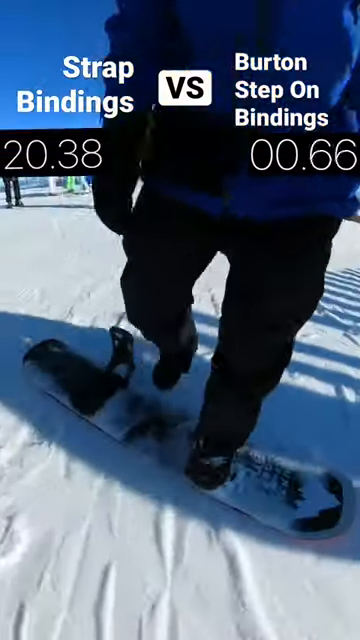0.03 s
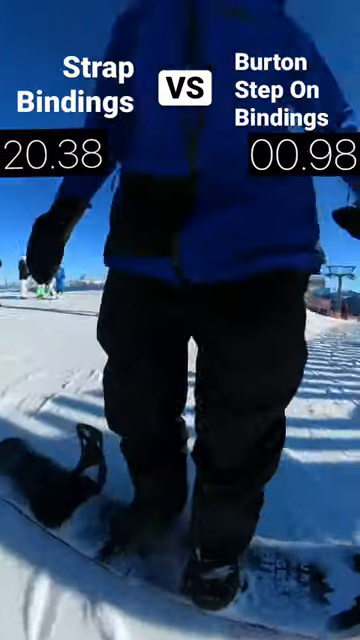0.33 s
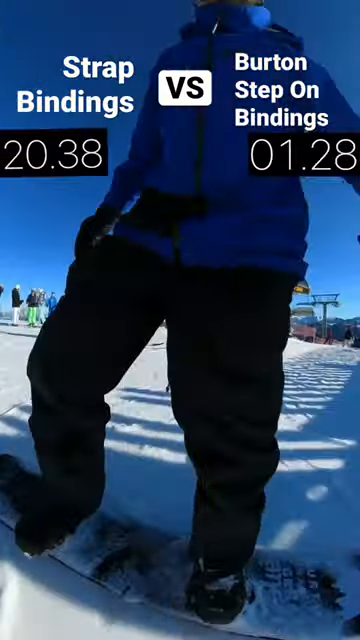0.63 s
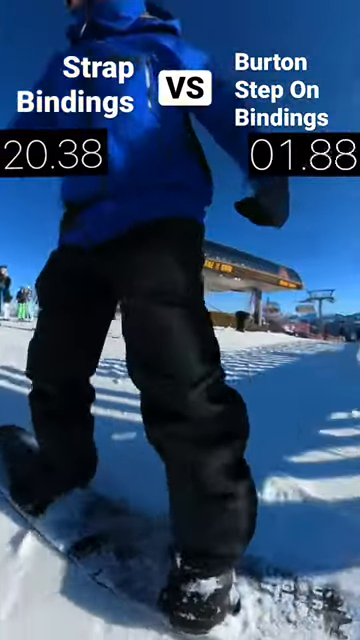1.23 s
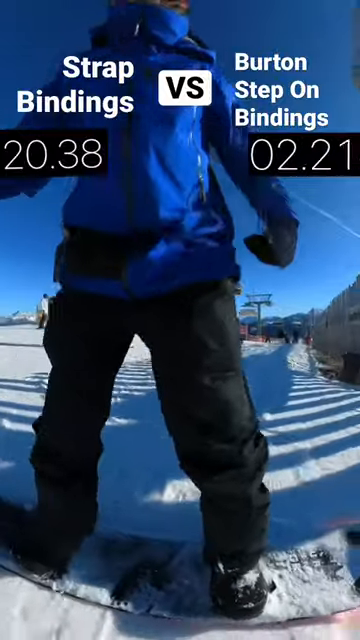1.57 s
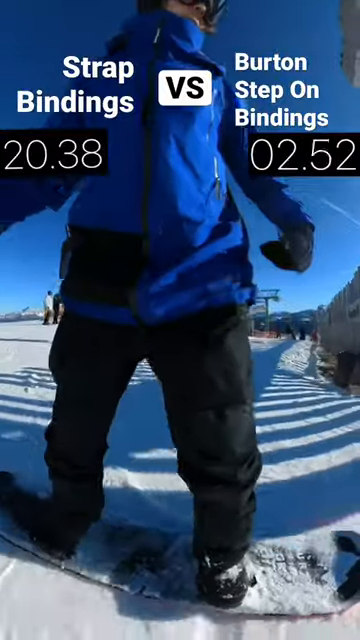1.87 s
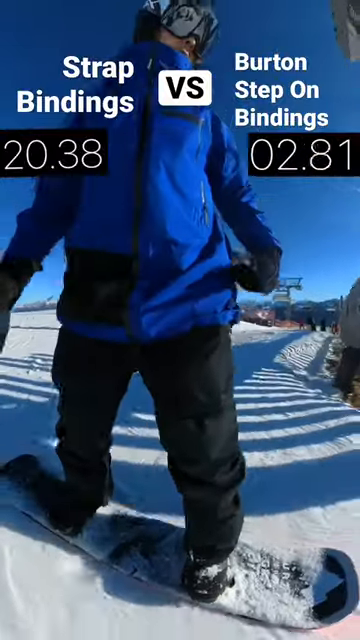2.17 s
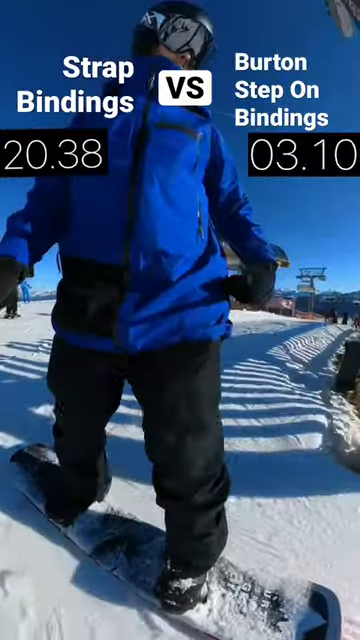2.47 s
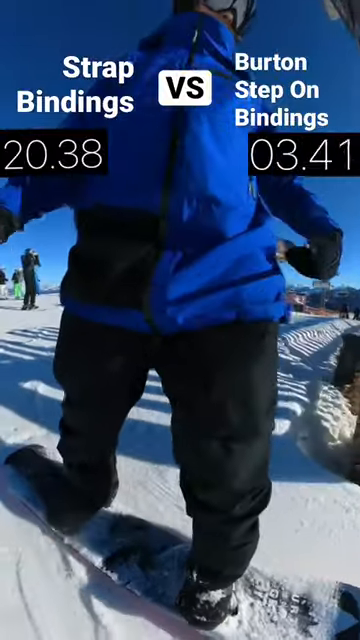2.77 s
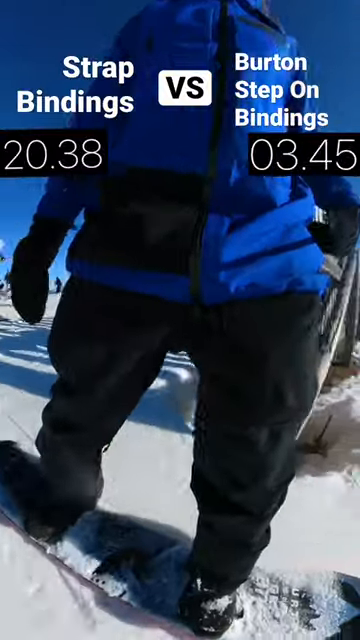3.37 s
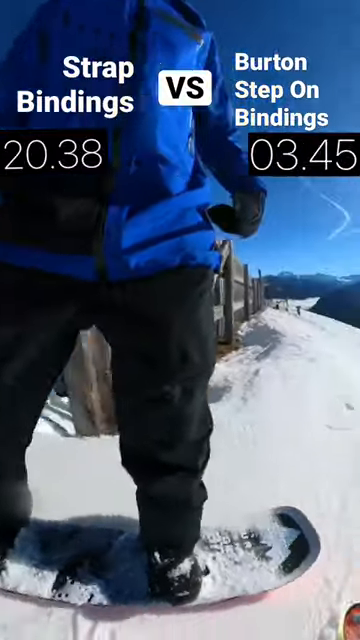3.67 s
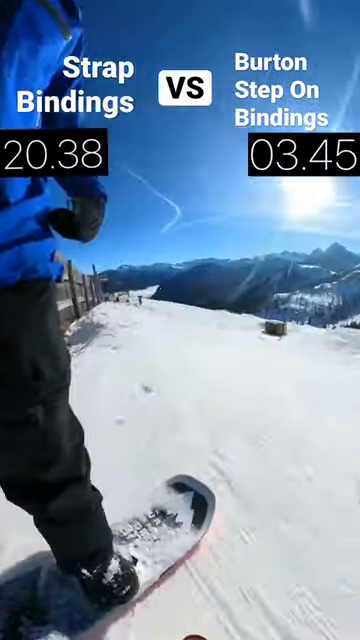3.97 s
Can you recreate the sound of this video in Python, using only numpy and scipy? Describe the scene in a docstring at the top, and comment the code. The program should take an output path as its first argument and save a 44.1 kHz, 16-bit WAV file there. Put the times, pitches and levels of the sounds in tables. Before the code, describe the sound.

A snowboard glides slowly over packed snow while wind buffets the rider's microphone. A boot stamps down and the binding locks with three sharp clicks. Later the board crunches and knocks over rough crust, above a faint low hum.

```python
"""Snowboard on packed snow

A board glides slowly: crystals hiss under the base, crumbs drum on the board. Wind buffets the
rider's microphone. A boot stamps onto its binding, which locks with three sharp, ringing clicks.
Later the board crunches and knocks over rough crust. Underneath, a low hum, probably a chairlift drive."""
import sys
import numpy as np
from scipy import signal
from scipy.fft import rfft, irfft
from scipy.io import wavfile
from scipy.ndimage import uniform_filter1d

SR = 44100
rng = np.random.default_rng(int(sys.argv[2]) if len(sys.argv) > 2 else 0)


def generate_wav(sig):
    """Save sig (samples, or channels by samples) to the path in sys.argv[1] as 16-bit PCM at SR."""
    pcm = np.round(np.clip(np.atleast_2d(sig).T, -1, 1) * 32767).astype(np.int16)
    wavfile.write(sys.argv[1], SR, pcm)


N = 176400
T = np.arange(N) / SR

# hum partials (frequency [Hz], level [dB], pitch wander [fraction])
HUM_LINES = [(81.06, -34, 0.026), (195.8, -45.5, 0.017)]
# hum envelope (time [s], gain [dB])
HUM_GAIN = [(0, 2.5), (.5, -3.5), (.7, -4.5), (1.3, -3.5), (1.6, 4), (2.6, 0), (3, 0.5), (3.45, 4),
            (3.65, -12), (4, -8)]

# airflow and deep rumble envelopes (time [s], gain [dB])
GUST_GAIN = [(0, -30.5), (.12, -39), (.22, -34.5), (.33, -39), (.78, -41.5), (.83, -29), (.92, -34.5),
             (.98, -26.5), (1.12, -31.5), (1.22, -26.5), (1.31, -37), (1.45, -35.5), (1.56, -56),
             (1.68, -42), (1.76, -33.5), (1.84, -41), (1.92, -37), (1.98, -39), (2.07, -28), (2.2, -28),
             (2.3, -36.5), (2.43, -39.5), (2.52, -37), (2.61, -26.5), (2.645, -42), (2.82, -43), (2.9, -41),
             (3.11, -36.5), (3.19, -29), (3.33, -36), (3.47, -31.5), (3.65, -37.5), (4, -34)]
RUMBLE_GAIN = [(0, -55), (.25, -33), (.36, -54), (.55, -49), (.62, -43), (.95, -43), (1.1, -34),
               (1.26, -33), (1.45, -40), (1.57, -44.5), (1.75, -31), (1.92, -35), (2.02, -41),
               (2.14, -31.5), (2.4, -30.5), (2.62, -29.5), (2.68, -48), (2.83, -29.5), (2.92, -46.5),
               (3.1, -35), (3.55, -37.5), (4, -38.5)]
# their spectra (frequency [Hz], gain [dB])
WIND_COLOUR = [(30, -13.5), (60, -19.5), (100, 6.5), (160, 1), (250, -3.5), (400, -16.5), (700, -32.5),
               (1500, -51), (4000, -76.5)]
RUMBLE_COLOUR = [(12, -25), (25, -17), (40, 3.5), (60, 5.5), (90, -3.5), (200, -24), (600, -56.5)]
# eddies (time [s], half width [s], level [dB], low edge [Hz], high edge [Hz])
EDDIES = [(0.168, 0.02, -18, 50, 95.5), (1.728, 0.028, -27, 70, 231), (1.89, 0.033, -26, 69.4, 260),
          (1.925, 0.033, -24.5, 50, 193), (2.05, 0.022, -19, 95, 188), (2.111, 0.088, -30, 150, 475),
          (2.211, 0.023, -25.5, 85, 264), (2.402, 0.023, -19, 55.6, 143), (2.464, 0.023, -20.5, 55, 123),
          (2.571, .016, -28, 90, 260), (2.61, 0.021, -18.5, 111, 176), (2.605, 0.01, -27.5, 242, 470),
          (3.162, 0.01, -16.5, 72, 178), (3.245, 0.054, -36, 103, 243)]
# air slaps (time [s], half width [s], peak [dB])
SLAPS = [(1.895, 0.0021, -15.5), (2.004, 0.001, -18), (2.046, 0.0016, -15), (2.205, 0.00095, -19.5),
         (2.5899, 0.00061, -13.5), (2.633, 0.00047, -15.5)]

# base sliding on snow (time [s], hiss gain [dB], board gain [dB])
SLIDE_GAIN = [(0, -51.5, -41), (.2, -53.5, -40), (.41, -49.5, -42), (.52, -49.5, -42.5), (.8, -49.5, -43.5),
              (.93, -46, -41.5), (1.16, -46, -36), (1.23, -51.5, -45.5), (1.42, -47.5, -42),
              (1.6, -50.5, -40.5), (1.74, -46, -41.5), (1.95, -52, -48), (2.11, -48.5, -40),
              (2.3, -52, -41), (2.55, -51.5, -41.5), (2.64, -62, -65), (2.70, -58.5, -51), (2.74, -55, -45),
              (2.85, -54, -48.5), (2.96, -52, -39), (3.06, -56.5, -45.5), (3.15, -54.5, -43),
              (3.38, -54.5, -44), (3.5, -48.5, -47), (3.59, -44.5, -44), (3.73, -47, -42),
              (3.79, -48.5, -36.5), (3.9, -51.5, -40.5), (4, -47.5, -46.5)]
# midrange rasp of the hiss (time [s], boost [dB])
RASP_GAIN = [(0, 10), (.42, 2.5), (.8, 1), (1.1, -1), (1.7, 1.5), (2.2, 1.5), (2.55, 4), (2.7, 2.5),
             (3.2, 3), (3.6, -3.5), (4, -6)]
# snow hiss, rasp, scuff and stereo side spectra (frequency [Hz], gain [dB])
HISS_COLOUR = [(300, 4.5), (700, 5.5), (1100, 7), (1500, 6.5), (2100, 4), (2800, 3.5), (3600, 2), (4500, 2),
               (6500, 2), (7600, -6), (8500, -12), (9500, -16)]
RASP_COLOUR = [(900, -23.5), (1400, -2), (2300, -8.5), (3200, -20.5)]
SCUFF_COLOUR = [(500, -20), (1100, 7.5), (2000, 1.5), (3200, -0.5), (6000, -1), (8000, -14.5),
                (9500, -40.5)]
SIDE_COLOUR = [(100, -77), (1200, -46), (2500, -61.5), (3100, -8.5), (4800, -3.5), (6100, -7.5),
               (6900, -39.5), (9000, -25.5)]
# board resonances (frequency [Hz], width [Hz], gain [dB])
BOARD_MODES = [(178, 14, -0.5), (258, 50, 1), (376, 110, -2), (563, 280, -2.5), (734, 80, -11.5),
               (1150, 250, -15.5)]

# crust crunch envelope (time [s], level [dB])
CRUST_LEVEL = [(0, -52), (1.95, -56.5), (2.1, -45), (2.25, -50.5), (2.4, -51), (3.08, -47.5), (3.14, -44),
               (3.3, -51), (3.48, -43.5), (3.55, -27.5), (3.64, -34), (3.68, -29), (3.73, -29.5),
               (3.77, -44), (3.86, -51), (3.9, -29.5), (4, -50.5)]
# spectra of hard lumps and brittle ice (frequency [Hz], gain [dB])
CRUST_COLOUR = [(110, -26), (190, 2.5), (270, 8.5), (350, 6), (450, -10.5), (580, 3.5), (780, 2.5),
                (950, -10), (1300, -25), (2000, -32.5), (5000, -42.5)]
CRACKLE_COLOUR = [(400, -3), (800, 2), (1400, 1), (1900, -4), (2700, 0.5), (3600, -6.5), (6000, -5.5),
                  (8500, -18.5)]
# edge bites (time [s], half width [s], level [dB])
SCRAPES = [(0.291, 0.0067, -40), (0.402, 0.031, -40), (0.473, 0.0069, -46), (1.158, 0.013, -45),
           (2.387, 0.01, -34.5), (2.504, 0.0075, -46.5), (2.975, 0.0074, -47.5)]
# lumps hitting the board (time [s], peak [dB], decay [s], relative scuff gain [dB])
KNOCKS = [(1.606, -30, 0.0029, -25), (2.325, -26.5, 0.0036, -13), (2.351, -24, 0.0028, -12),
          (2.373, -17, 0.013, -23), (2.929, -29, .002, -18), (3.134, -22.5, 0.0029, -31),
          (3.44, -26, 0.0021, -29), (3.48, -30, .002, -28), (3.53, -15.5, 0.0031, -14.5),
          (3.558, -20, 0.0021, -19), (3.586, -17, 0.0022, -17), (3.612, -13, 0.0028, -15),
          (3.64, -21, .005, -9), (3.717, -16, 0.0013, -21), (3.734, -18, 0.0012, -13),
          (3.7409, -12.5, 0.0048, -17.5), (3.766, -30, 0.0033, -26), (3.816, -21, 0.0062, -23),
          (3.8886, -15, 0.01, -17), (3.973, -29, 0.0028, -22)]

# boot impacts (time [s], thud peak [dB], decay [s], snow crush [dB])
STOMPS = [(0.9545, -8.5, 0.0044, -28.5), (0.9591, -9, 0.0068, -24), (1.0, -16.5, .004, -31),
          (1.005, -13.5, .007, -49), (1.033, -18, .006, -39), (1.111, -15.5, 0.0018, -31.5)]
# resonances of sole on plate and of trapped snow (frequency [Hz], width [Hz], gain [dB])
SOLE_MODES = [(172, 68, 5), (245, 60, 3), (516, 200, 1.5)]
SNOW_MODES = [(1000, 330, -11), (1680, 360, 13), (2150, 440, 0), (2900, 510, -5), (4200, 1300, -30)]

# latch clicks and rebound (time [s], base plate [dB], heel cup [dB], lever [dB], catch [dB])
CLICKS = [(1.1392, -18, -20, -5.5, -14.5), (1.1427, -26, -41, -18.5, -27), (1.2502, -22, -16.5, -21, -13),
          (1.4695, -18, -5, -26, -13.5)]
# ringing binding parts (frequency [Hz], t60 [s], gain [dB])
PLATE_MODES = [(257, 0.01, 6.5), (630, 0.0057, 13.5)]
HEEL_CUP_MODES = [(940, 0.011, -2.1), (1106, 0.016, -1.2)]
LEVER_MODES = [(2765, 0.0055, -3.5), (3260, 0.0053, 4), (3570, 0.0062, 0.5), (6180, 0.011, -13)]
CATCH_MODES = [(1500, 0.0036, -4), (2040, 0.0082, -11.5), (3220, 0.0038, 5), (4770, 0.0032, 4.5),
               (6120, 0.0029, 3.5), (7450, 0.0023, -0.5)]
# latch rattle spectrum (frequency [Hz], gain [dB])
RATTLE_COLOUR = [(500, -13), (1400, 0), (3200, -15), (4700, -6), (6300, -5), (7800, -16), (9000, -15)]

# microphone roll-off (frequency [Hz], gain [dB])
MIC_COLOUR = [(8000, -1), (8600, -7.5), (9200, -19.5), (10000, -30)]


def undb(db):
    """Decibels to gain."""
    return 10 ** (np.asarray(db) / 20)


def unit(x):
    """Scale to rms 1."""
    return x / np.sqrt(np.mean(x ** 2))


def noise():
    """White noise."""
    return rng.standard_normal(N)


def curve(rows, column=1):
    """Gain over time from one dB column."""
    rows = np.array(rows)
    return undb(np.interp(T, rows[:, 0], rows[:, column]))


def colour(x, points):
    """Filter by (Hz, dB) points."""
    hz, db = np.array(points).T
    bin_hz = np.arange(N // 2 + 1) * SR / N
    return irfft(rfft(x) * undb(np.interp(np.log(bin_hz + 1), np.log(hz), db)), N)


def butter(x, order, edge_hz, kind="low"):
    """Butterworth filter."""
    return signal.sosfilt(signal.butter(order, edge_hz, kind, fs=SR, output="sos"), x)


def resonate(x, modes):
    """Parallel damped resonances."""
    return sum(undb(db) * signal.lfilter(*signal.iirpeak(hz, hz / width_hz, fs=SR), x)
               for hz, width_hz, db in modes)


def walk(rate_hz):
    """Smooth random motion, rms 1."""
    hold = int(SR / rate_hz)
    steps = np.repeat(noise()[:N // hold + 1], hold)
    return unit(uniform_filter1d(uniform_filter1d(steps, hold), hold)[:N])


def grains(per_s, spread_db):
    """Random impulses, most small, a few large."""
    impulses = (rng.random(N) < per_s / SR) * np.sign(noise())
    return impulses * undb(spread_db * np.minimum(rng.exponential(size=N), 4))


def fade(at_s, decay_s):
    """Sudden start, exponential decay."""
    return (T >= at_s) * np.exp(-np.maximum(T - at_s, 0) / decay_s)


def wide(mid, side):
    """Stereo pair, differing in the treble."""
    return mid + colour(side, SIDE_COLOUR) * np.array([[1], [-1]])


def patchy(x, bands=12, low_hz=500, span_ratio=18, depth_db=2.5):
    """Log-spaced bands flicker independently."""
    bin_hz = np.arange(N // 2 + 1) * SR / N
    position = np.clip(np.log(bin_hz / low_hz + 1e-9) / np.log(span_ratio), 0, 1) * (bands - 1)
    spectrum = rfft(x)
    slices = (irfft(spectrum * np.maximum(1 - abs(position - k), 0), N) for k in range(bands))
    return sum(part * undb(depth_db * walk(rate_hz=28)) for part in slices)


def hum(waver_db=2):
    """Low machine hum, wavering in pitch and level."""
    out = np.zeros(N)
    for hz, db, wander in HUM_LINES:
        pitch_hz = hz * (1 + wander * walk(rate_hz=18))
        tone = np.sin(2 * np.pi * np.cumsum(pitch_hz) / SR)
        out += undb(db) * unit(tone * undb(waver_db * walk(rate_hz=7.7)))
    return out * curve(HUM_GAIN)


def wind(gust_db=3, rumble_db=2.5, flutter_db=3.5):
    """Fluttering turbulence, deep rumble and single eddies thumping the microphone."""
    turbulence = colour(noise(), WIND_COLOUR) * undb(flutter_db * walk(rate_hz=39))
    out = unit(turbulence) * curve(GUST_GAIN) * undb(gust_db)
    out += unit(colour(noise(), RUMBLE_COLOUR)) * curve(RUMBLE_GAIN) * undb(rumble_db)
    for at_s, width_s, db, low_hz, high_hz in EDDIES:
        swell = np.exp(-2 * ((T - at_s) / width_s) ** 2)
        eddy = swell * butter(noise(), 2, [low_hz, high_hz], "band")
        out += undb(db) * unit(eddy) * np.sqrt(np.mean(swell ** 2))
    return out


def air_slaps():
    """Each slap: one quick push and pull of air on the microphone."""
    out = np.zeros(N)
    for at_s, width_s, db in SLAPS:
        lead = (at_s - T) / width_s
        out += undb(db) * lead * np.exp((1 - lead ** 2) / 2)
    return out


def board(force, top_hz=968):
    """Damped ring of the board."""
    return butter(resonate(force, BOARD_MODES), 4, top_hz)


def snow_hiss(noise_db=1, grain_db=-3.5):
    """Crystals hiss, crackle and rasp under the base."""
    crystals = undb(noise_db) * noise() + undb(grain_db) * unit(grains(per_s=1500, spread_db=4.5))
    hiss = unit(patchy(colour(crystals, HISS_COLOUR))) * np.std(crystals)
    return hiss + (curve(RASP_GAIN) - 1) * colour(hiss, RASP_COLOUR)


def glide(drone_db=-5, crumb_db=-2):
    """The sliding base hisses; the board drones and crumbs of crust drum on it."""
    drone = undb(drone_db) * unit(board(noise()))
    crumbs = undb(crumb_db) * unit(board(grains(per_s=220, spread_db=4.5)))
    contact = curve(SLIDE_GAIN)
    hiss = wide(snow_hiss() * contact, snow_hiss() * contact)
    return hiss + (drone + crumbs) * curve(SLIDE_GAIN, column=2)


def crust(crackle_db=-15.5):
    """Hard lumps crunch, brittle ice crackles, the edge briefly bites the snow."""
    crunch = unit(colour(grains(per_s=1100, spread_db=3.2), CRUST_COLOUR))
    crackle = undb(crackle_db) * unit(colour(grains(per_s=330, spread_db=4), CRACKLE_COLOUR))
    bite = sum(undb(db) * np.exp(-((T - at_s) / width_s) ** 2) for at_s, width_s, db in SCRAPES)
    scrape = unit(colour(grains(per_s=1500, spread_db=1.2), SCUFF_COLOUR))
    return (crunch + crackle) * curve(CRUST_LEVEL) + bite * scrape


def knocks(scuff_trim_db=-5.5):
    """Each lump gives a short gritty push that rings the board and scuffs the snow."""
    body, scuff_gain = np.zeros(N), np.zeros(N)
    for at_s, db, decay_s, scuff_db in KNOCKS:
        push = fade(at_s, decay_s)
        ring = board(push * noise())
        body += undb(db) * ring / np.abs(ring).max()
        scuff_gain += undb(db + scuff_db + scuff_trim_db) * push
    mid, side = (scuff_gain * unit(colour(noise(), SCUFF_COLOUR)) for _ in range(2))
    return body + wide(mid, side)


def stomps(grit=2.36, top_hz=755, crush_s=0.0044):
    """The sole thuds onto its plate and crushes the snow trapped there."""
    thud, crush = np.zeros(N), np.zeros(N)
    for at_s, db, decay_s, crush_db in STOMPS:
        push = fade(at_s, decay_s) * (1 + grit * noise())
        ring = butter(resonate(push, SOLE_MODES), 2, top_hz)
        thud += undb(db) * ring / np.abs(ring).max()
        crush += undb(crush_db) * fade(at_s, crush_s)
    return thud + crush * unit(resonate(noise(), SNOW_MODES))


def latch(contact_s=0.00036, rattle_db=-11.5, rattle_s=0.0021):
    """Binding parts snap home and ring, adjacent modes in opposite sign; the catch rattles faintly."""
    parts = (PLATE_MODES, HEEL_CUP_MODES, LEVER_MODES, CATCH_MODES)
    rings, rattle = np.zeros(N), np.zeros(N)
    for at_s, *parts_db in CLICKS:
        age_s = np.maximum(T - at_s, 0)
        attack = 1 - np.exp(-age_s / contact_s)
        for modes, part_db in zip(parts, parts_db):
            for k, (hz, t60_s, db) in enumerate(modes):
                envelope = attack * undb(db + part_db - 60 * age_s / t60_s)
                rings += (-1) ** k * envelope * np.sin(2 * np.pi * hz * age_s)
        rattle += undb(parts_db[-1] + rattle_db) * fade(at_s, rattle_s)
    return rings + rattle * unit(colour(noise(), RATTLE_COLOUR))


def scene():
    """Stereo sum of wind, hum, board, boot and binding."""
    return wind() + air_slaps() + hum() + glide() + crust() + knocks() + stomps() + latch()


def record(dry):
    """Microphone roll-off, then a steep treble cut."""
    top_hz = 9500
    return signal.sosfilt(signal.ellip(8, .2, 70, top_hz, fs=SR, output="sos"), colour(dry, MIC_COLOUR))


dry = scene()
out = record(dry)
generate_wav(out)
```